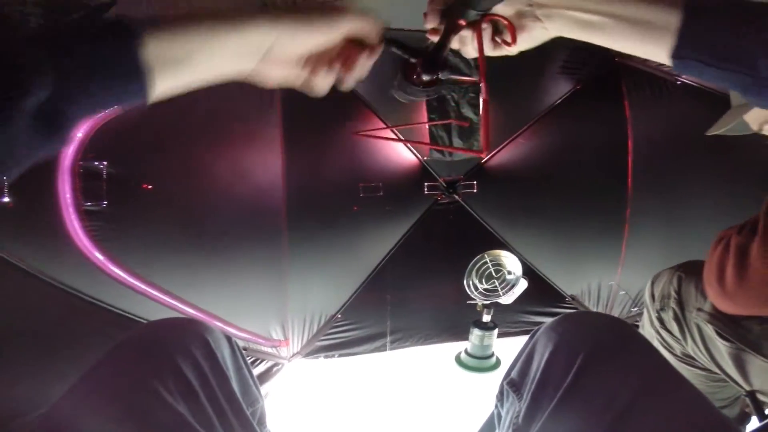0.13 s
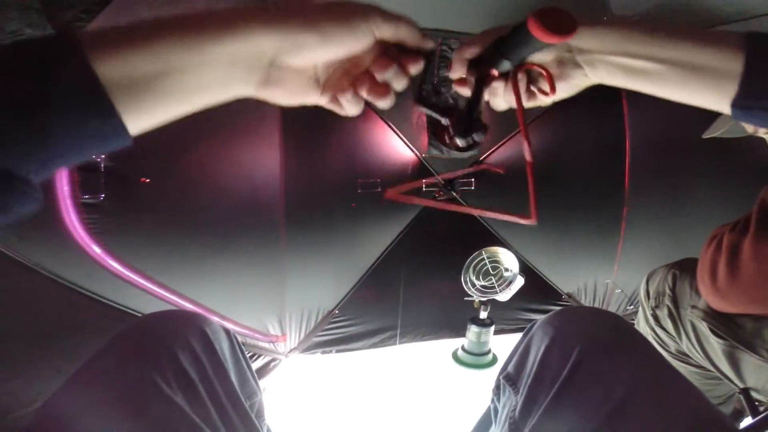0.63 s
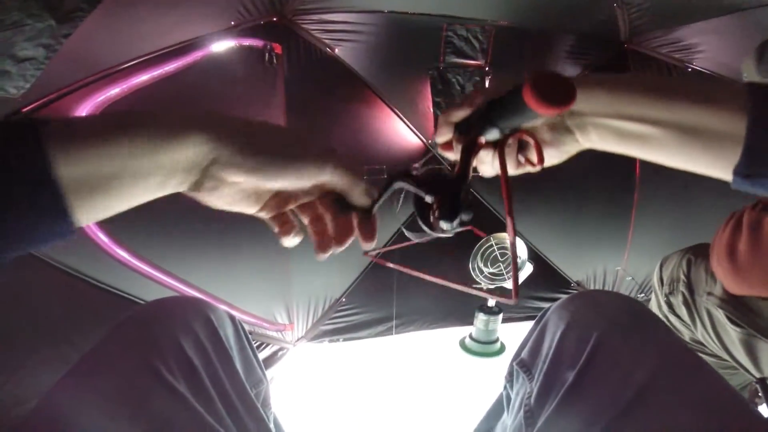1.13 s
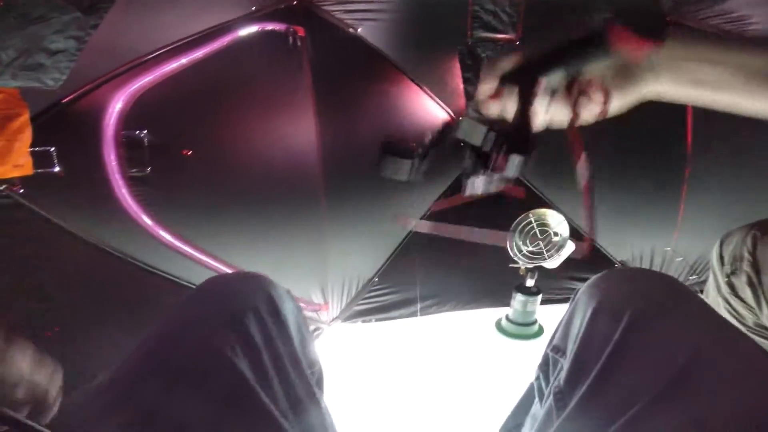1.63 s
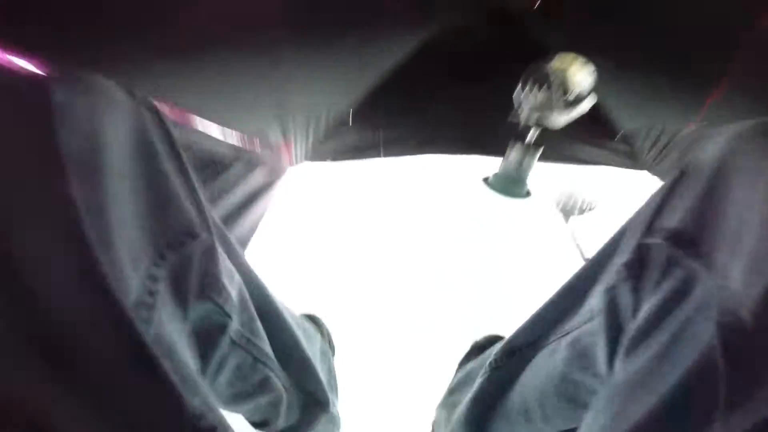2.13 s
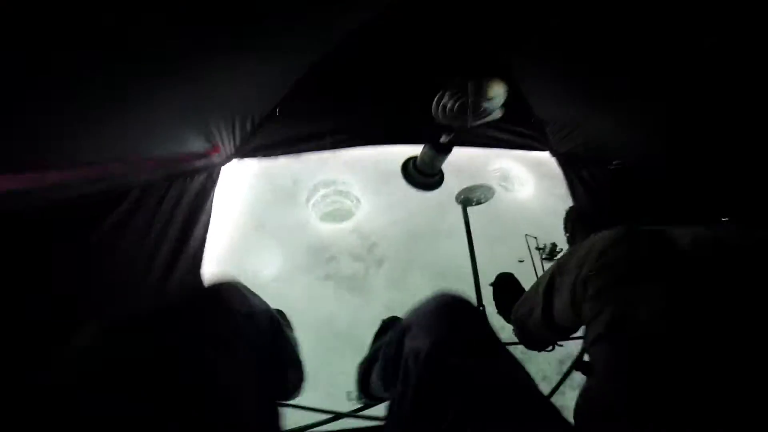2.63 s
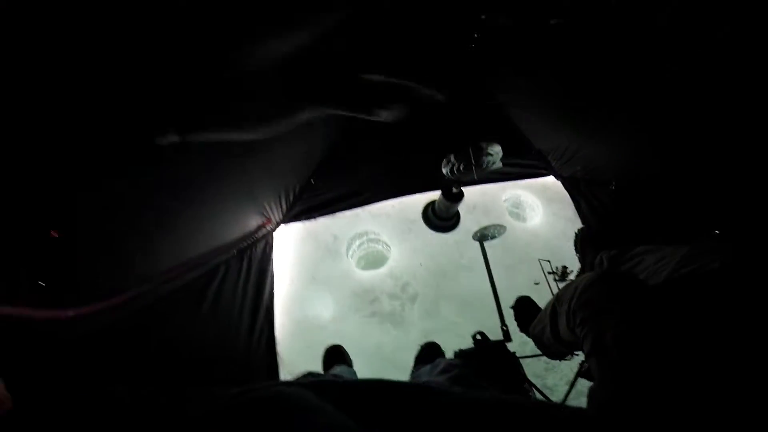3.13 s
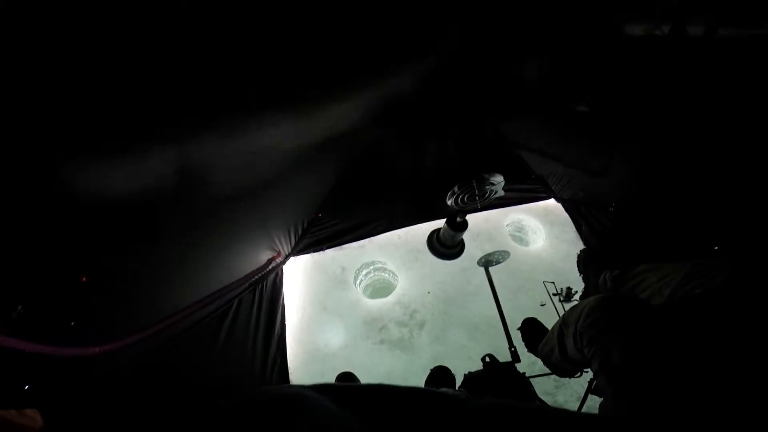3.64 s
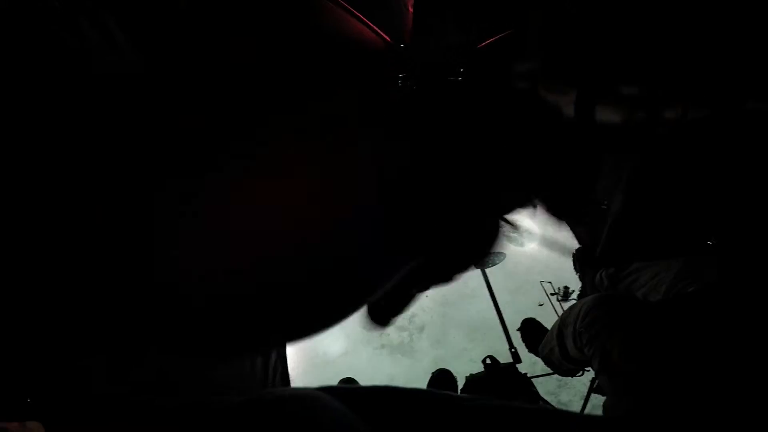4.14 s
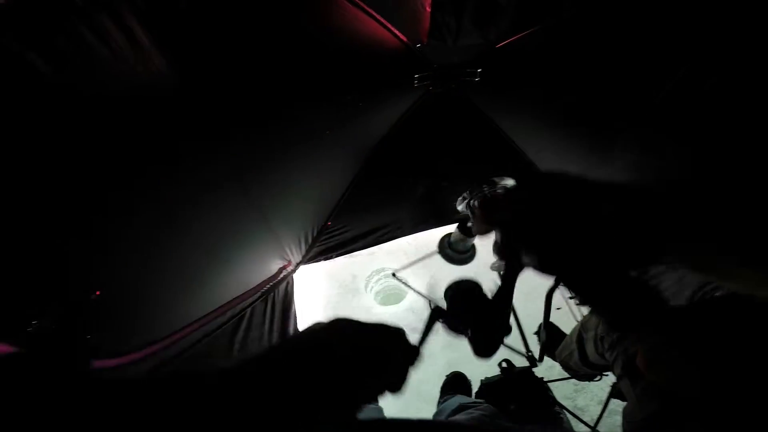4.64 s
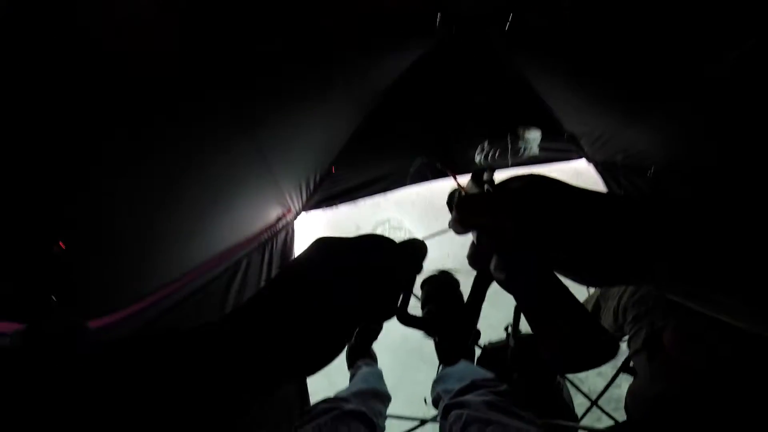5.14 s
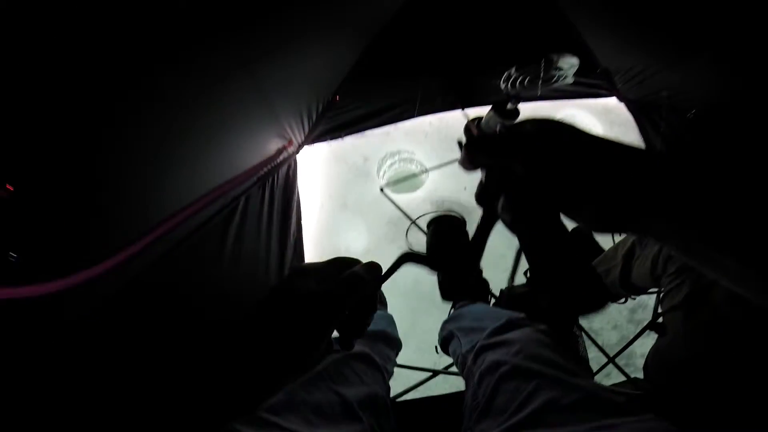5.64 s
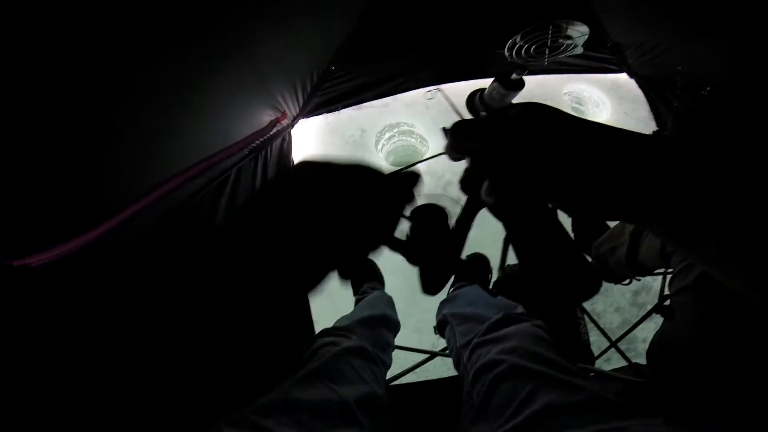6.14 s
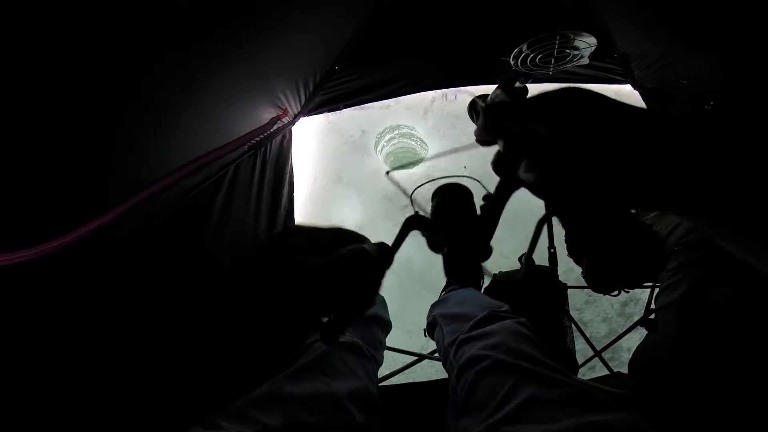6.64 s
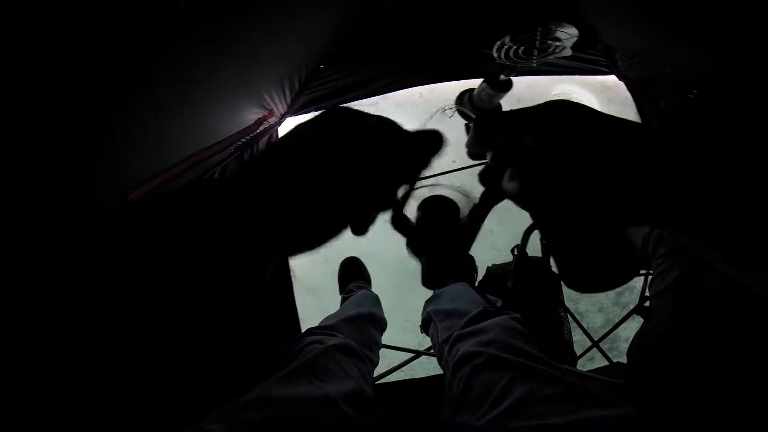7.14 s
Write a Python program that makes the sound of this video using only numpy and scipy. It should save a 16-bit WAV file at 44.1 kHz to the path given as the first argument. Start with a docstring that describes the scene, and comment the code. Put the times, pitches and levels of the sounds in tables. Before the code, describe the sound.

Close clothing rustle and soft bumps build to sharp clicks and a loud hollow plastic crack, then settle into hiss, small taps and faint electronic buzzes.

```python
"""Cloth rubs and bumps a chest-worn camera: noise with catches and ticks through case resonances, plus low shake.
The strap clicks as the wearer stands: noise bursts through the case with a ringing thump; taps and soft bumps ring.
The plastic mount knocks and scrapes: bursts and gritty noise drive its shell and hollow.
The circuits add shaped hiss, a faint three-tone whine, pulsed high buzzes, falling chirps and two-tone blips."""
import sys
import numpy as np
from scipy import signal
from scipy.fft import rfft, irfft, next_fast_len
from scipy.io import wavfile
from scipy.ndimage import uniform_filter1d, map_coordinates

SR = 44100
rng = np.random.default_rng(int(sys.argv[2]) if len(sys.argv) > 2 else 0)


def persist_wave(psi):
    """Save psi, clipped to +-1, as 16-bit WAV."""
    counts = np.round(np.clip(psi, -1, 1) * 32767).astype(np.int16)
    wavfile.write(sys.argv[1], SR, np.atleast_2d(counts).T)


def gain_from_decibels(decibels):
    """Convert decibel values to linear amplitude factors."""
    exponent = np.asarray(decibels, float) / 20
    return 10 ** exponent


N = 321048
T = np.arange(N) / SR  # s

# case resonances in four groups, low to high (f/Hz, width/Hz, relative level/dB)
CASE = [
    [(1521, 250, -1.5)],
    [(2235, 228, 5), (2832, 370, -5)],
    [(3250, 180, -5), (3840, 480, -9), (4655, 510, -13.5)],
    [(5310, 470, -12.5), (5960, 370, -9.5), (8020, 940, -20.5), (11400, 1600, -25.5), (14600, 2200, -30)],
]


def unit(x):
    """Scale to rms 1."""
    return x / np.sqrt(np.mean(x ** 2) + 1e-20)


def filtered(x, response):
    """Apply a complex response of frequency to x."""
    m = next_fast_len(N + SR // 2)
    spectrum = rfft(x, m) * response(np.fft.rfftfreq(m, 1 / SR))
    return irfft(spectrum, m)[:N]


def coloured(points):
    """Noise of rms 1 with its spectrum interpolated over log frequency."""
    f_hz, level_db = np.transpose(points)
    response = lambda hz: gain_from_decibels(np.interp(np.log(hz + 1), np.log(f_hz), level_db))
    return unit(filtered(rng.standard_normal(N), response))


def wobble(rate_hz):
    """Smooth random curve of rms 1, rate_hz knots a second."""
    knots = rng.standard_normal(int(N * rate_hz / SR) + 4)
    return unit(map_coordinates(knots, [T * rate_hz]))


def ring(modes, spread_db, attack_s):
    """One blow: damped modes at slightly random strengths, peak 1."""
    t = T[:SR // 5]
    x = np.zeros(len(t))
    for hz, db, t60_s in modes:
        level_db = db + spread_db * rng.standard_normal() - 60 * t / t60_s
        x += gain_from_decibels(level_db) * np.sin(2 * np.pi * hz * t)
    x *= 1 - np.exp(-t / attack_s)
    return x / np.abs(x).max()


def crackle(t60_s):
    """A sharp contact plus a short decaying noise burst, energy 1."""
    t = T[:SR // 20]
    burst = rng.standard_normal(len(t)) * gain_from_decibels(-60 * t / t60_s) * (1 - np.exp(-t / 0.00032))
    burst = burst / np.linalg.norm(burst) + 0.77 * (t == 0)
    return burst / np.linalg.norm(burst)


def resonances(modes, first):
    """Causal band-pass modes, alternating in sign from mode number first."""
    def response(f):
        total = 0
        for k, (centre, width, db) in enumerate(modes, first):
            damping = 1j * f * width
            total = total + (-1) ** k * gain_from_decibels(db) * damping / (centre ** 2 - f ** 2 + damping)
        return total / (1 + 1j * f / 9000) ** 2  # the far treble rolls off
    return response


def body(groups, drives):
    """Each group of resonances responds to its own excitation."""
    out, first = np.zeros(N), 0
    for modes, drive in zip(groups, drives):
        out += filtered(drive, resonances(modes, first))
        first += len(modes)
    return out


def add(track, t_s, x):
    """Mix x in at t_s."""
    part = track[round(t_s * SR):][:len(x)]
    part += x[:len(part)]


def sparse(rate_hz, size):
    """Random impulses, rate_hz a second on average."""
    return (rng.random(N) < rate_hz / SR) * rng.standard_normal(N) * size


def cloth():
    """Fibres slide over the case with catches and ticks, folds crumple; the chest shakes the microphone."""
    # wearer's movement (t/s, chest shake level/dB, cloth rub level/dB)
    movement = [(0.0, -58, -54.5), (0.09, -48.5, -44.5), (0.19, -52.5, -59), (0.45, -53, -60),
                (0.68, -57.5, -64.5), (1.06, -59, -60), (1.4, -55.5, -59.5), (1.6, -53, -54.5),
                (1.9, -51.5, -59.5), (2.1, -42, -50.5), (2.23, -34.5, -42.5), (2.35, -43.5, -52),
                (2.55, -42.5, -40.5), (2.62, -53, -55), (2.8, -46, -58), (3.02, -50.5, -57),
                (3.3, -56.5, -66.5), (3.79, -56.5, -72), (4.13, -57, -62), (5.3, -54, -65.5),
                (5.5, -55.5, -65.5), (6.17, -57, -64), (6.34, -53.5, -59.5), (6.5, -62, -63.5),
                (6.68, -59, -83.5), (7.05, -57.5, -78), (7.27, -56.5, -61.5)]
    # chest shake spectrum (f/Hz, relative level/dB per Hz)
    shake_spectrum = [(8.8, -26), (15, 7.5), (26, -3.5), (54, -8.5), (157, -11), (261, -18.5), (400, -26),
                      (520, -49.5), (880, -120)]
    # cloth fold spectrum (f/Hz, relative level/dB per Hz)
    fold_spectrum = [(150, -40.5), (300, -1), (900, -3), (1400, -8), (4000, -13.5), (7000, -18),
                     (12000, -40)]
    sway_db, sway_hz = 1, 7  # small unplanned movements
    fine_db, dull_per_db = 3, 0.33  # treble boost; falls as the chest shake grows
    fold_db = -9.5  # re rub
    t_s, *levels = np.transpose(movement)
    shake_db, rub_db = [np.interp(T, t_s, level) + sway_db * wobble(sway_hz) for level in levels]

    slide = rng.standard_normal(N) * gain_from_decibels(.7 * wobble(30) + 2 * wobble(200))
    catches = slide * gain_from_decibels(wobble(60) - 1) + sparse(30, 13)
    ticks = np.diff(sparse(15, 8), prepend=0)  # crisp creases snap in the treble
    scale = gain_from_decibels(rub_db) / np.std(body(CASE, [slide, catches, slide, slide]))
    fine = scale * gain_from_decibels(fine_db - dull_per_db * (shake_db - shake_db.mean()))
    rub = body(CASE, [scale * slide, scale * catches, fine * slide, fine * (slide + ticks)])

    shake = gain_from_decibels(shake_db) * unit(coloured(shake_spectrum) * gain_from_decibels(2 * wobble(14)))
    crumple = unit(coloured(fold_spectrum) * gain_from_decibels(3 * wobble(25) + 3 * wobble(150)))
    return rub + gain_from_decibels(rub_db + fold_db) * crumple + shake


def clicks():
    """Strap and gear click: crackle of a few ms through the case, with a low thump as it rocks."""
    # clicks (t/s, level/dB, weight/dB, brightness/dB), all relative
    hits = [(0.2852, -45, -7, -8), (0.55, -46, -3, 3), (1.424, -40, -18, -1), (1.905, -43, -5, -7),
            (1.933, -43, -12, -8), (1.9672, -38.5, 0, 0), (2.0532, -26.5, -7.5, -2.5),
            (2.1024, -24, -3, -2), (2.145, -21.5, -8, -2), (2.188, -21, -5, 2.5), (2.1987, -27, -6, -1.5),
            (2.2116, -29.5, 5, -3), (2.389, -8, -4.5, -4.5), (2.3941, -16.5, 2.5, -10),
            (2.6062, -30, 1.5, -7), (2.702, -36, 7, 8.5), (2.7074, -26, 6.5, 1.5), (2.7408, -23, 8, 4),
            (2.7475, -23.5, 2.5, -1.5), (2.761, -46, 16, 17), (2.7798, -25, 4, 5.5),
            (2.7872, -27, 5.5, 9.5), (2.828, -24, 5.5, 7), (2.843, -38, 8, 7), (2.9653, -22.5, 4.5, 8),
            (2.9858, -25, 2, 7.5), (3.076, -49, 7.5, 0), (3.176, -54, 3, 19.5), (3.7503, -46, 3, -3.5),
            (4.156, -45.5, -3, 0), (5.0366, -47.5, 2, -1), (5.0751, -41.5, -7, -7.5), (5.2227, -47, -2, -3),
            (5.257, -43.5, -2.5, -5.5), (5.3043, -41, -10, -5), (5.667, -31.5, -4, -8),
            (5.7195, -20, -8.5, 4.5), (5.75, -42, -3, -2), (6.253, -36, -4, -9), (6.341, -40, -4, -8)]
    # case rocking on the chest (f/Hz, relative level/dB, t60/s)
    rocking = [(150, -7.5, 0.099), (283, 3, 0.018), (427.2, -9.5, 0.032)]
    group_db = [27.5, 25, 26.2, 26.2]  # drive of the case groups
    thump_db, thump_per_db = -6, 0.77  # re click; gain per dB of weight
    drives, thumps = np.zeros((4, N)), np.zeros(N)
    for t_s, db, weight_db, bright_db in hits:
        burst = gain_from_decibels(db) * crackle(0.013)
        snap = burst * gain_from_decibels(-60 * T[:len(burst)] / 0.013)  # top group decays faster
        shares_db = np.add(group_db, [weight_db, 0, bright_db, bright_db])
        for drive, share_db, push in zip(drives, shares_db, [burst, burst, burst, snap]):
            add(drive, t_s, gain_from_decibels(share_db) * push)
        thump = ring(rocking, spread_db=6.5, attack_s=0.00021)
        add(thumps, t_s, gain_from_decibels(db + thump_per_db * weight_db + thump_db) * thump)
    return body(CASE, drives) + thumps


def taps():
    """Taps ring a small part at one mode and crackle through the second case group."""
    # taps (t/s, ring peak/dB, snap relative to ring/dB)
    hits = [(1.191, -44, 12.5), (3.262, -45, -11), (3.4358, -47, -9), (3.6509, -39.5, -3.5),
            (4.0626, -34.5, -9)]
    # small part (f/Hz, relative level/dB, t60/s)
    part = [(1640, 0, .05)]
    drives, rings = np.zeros((4, N)), np.zeros(N)
    for t_s, db, snap_db in hits:
        add(rings, t_s, gain_from_decibels(db) * ring(part, spread_db=0, attack_s=0.00008))
        add(drives[1], t_s, gain_from_decibels(db + snap_db + 23.5) * crackle(0.0076))
    return body(CASE, drives) + rings


def bumps():
    """Soft bumps of the body: a damped low mode and a weaker one at 2.1 times its frequency."""
    # bumps (t/s, relative level/dB, f/Hz)
    hits = [(.04, -42.5, 94), (.286, -35, 105.6), (1.491, -31.5, 116), (2.004, -37.5, 100),
            (2.207, -33.5, 135), (2.474, -23, 134.5), (2.535, -32.5, 217), (5.905, -45, 63.8),
            (6.906, -46.5, 61.7), (7.115, -41.5, 61)]
    out = np.zeros(N)
    for t_s, db, hz in hits:
        modes = [(hz, 0, .07), (2.1 * hz, -7, .035)]
        add(out, t_s, gain_from_decibels(db - 2.5) * ring(modes, spread_db=1, attack_s=.002))
    return out


def knocks(hollow):
    """Knocks crack the shell and ring the hollow; returns shell drives and hollow sound."""
    # knocks (t/s, shell level/dB, middle/dB, treble/dB, hollow peak/dB); shell columns relative
    hits = [(2.6491, -1.5, 7, 5, -10.5), (2.6585, -7, 4, 2, -13.5), (2.870, -41, 14, 15, -36.5),
            (2.886, -27, -5, -16, -39), (2.899, -29, -8, -14, -52), (5.4140, -26.5, 2.5, 15, -26.5),
            (5.418, -31.5, 4, 16, -38), (5.437, -49, 4, 12, -65), (5.457, -30, -2.5, 1, -41.5),
            (5.462, -41, 2, 12, -47), (5.474, -40, 0, 4, -41)]
    group_db = [24, 26, 22, 36]  # drive of the shell groups
    hard_per_db = .6  # harder knocks reach further into the top group
    # after its rebound the hardest knock chatters
    start_s, gap_s, first_db, loss_db = 2.663, .0042, -8.5, 4.5
    chatter = []
    for k in range(6):
        db = first_db - loss_db * k
        chatter.append((start_s + k * gap_s, db, 2.5 - .8 * k, -1.5 - 1.5 * k, db - 7.5))
    drives, cavity = np.zeros((4, N)), np.zeros(N)
    for t_s, db, middle_db, treble_db, hollow_db in hits + chatter:
        burst = gain_from_decibels(db) * crackle(0.012)
        shares_db = np.add(group_db, [0, middle_db, treble_db, hard_per_db * db])
        for drive, share_db in zip(drives, shares_db):
            add(drive, t_s, gain_from_decibels(share_db) * burst)
        add(cavity, t_s, gain_from_decibels(hollow_db) * hollow)
    return drives, cavity


def scrapes(hollow):
    """Gritty noise swells, then stops; returns shell drives and hollow sound."""
    # scrapes (start/s, peak/s, end/s, relative peak level/dB, relative hollow level/dB)
    strokes = [(2.823, 2.831, 2.846, -39, 1.5), (2.85, 2.885, 2.914, -36.5, -4),
               (5.382, 5.397, 5.409, -48, 17), (5.408, 5.43, 5.452, -52, -10),
               (5.434, 5.462, 5.487, -46, -13.5)]
    swell_db, fade_db = 10, 15.5  # below the peak at start and end
    group_gain = gain_from_decibels(np.array([[13], [8], [5], [0]]))
    rasp = rng.standard_normal(N) * gain_from_decibels(3.4 * wobble(300))
    drives, push = np.zeros((4, N)), np.zeros(N)
    for start_s, peak_s, end_s, db, hollow_db in strokes:
        levels_db = [db - swell_db, db, db - fade_db]
        grit = rasp * gain_from_decibels(np.interp(T, [start_s, peak_s, end_s], levels_db, left=-120, right=-120))
        drives += group_gain * grit
        push += grit * gain_from_decibels(hollow_db - 24)
    return drives, signal.fftconvolve(push, hollow)[:N]


def stiffness(f):
    """High-pass at 1400 Hz: the stiff shell hardly moves below its first mode."""
    u = f / 1400
    return (1j * u / (1 + 1.2j * u - u ** 2) * 1j * u) ** 2


def mount():
    """Knocks and scrapes sound through the mount's plastic shell and its cavity."""
    # shell resonances in four groups, low to high (f/Hz, width/Hz, relative level/dB)
    shell = [
        [(1603, 170, 3.5), (2100, 190, 2), (2217, 100, 2.5), (2766, 140, 1)],
        [(3240, 230, -9.5), (4000, 610, -9.5), (5170, 450, -8), (5950, 470, -9)],
        [(7670, 450, -9), (9010, 670, -25.5)],
        [(11600, 1500, -24), (14180, 1800, -23)],
    ]
    # cavity modes (f/Hz, relative level/dB, t60/s)
    cavity_modes = [(710, -14, .04), (787, 3, .055), (881, -8.5, 0.063)]
    hollow = ring(cavity_modes, spread_db=2.5, attack_s=0.0012)
    knock_drives, knock_cavity = knocks(hollow)
    scrape_drives, scrape_cavity = scrapes(hollow)
    shell_sound = filtered(body(shell, knock_drives + scrape_drives), stiffness)
    return shell_sound + knock_cavity + scrape_cavity


def buzzes():
    """Pulse trains at 136 Hz ring near 10 kHz, with noise around the ring."""
    # buzzes (start/s, length/s)
    spans = [(1.775, 0.15), (1.895, 0.15), (2.04, .07), (2.191, .05), (2.30, 0.055), (2.47, .05),
             (2.78, 0.045), (2.94, .05), (3.955, 0.047), (4.115, 0.049), (4.25, .05), (4.37, 0.043),
             (4.52, .055), (4.625, 0.044), (4.74, 0.05), (4.88, 0.059), (5.007, .05), (5.187, 0.044),
             (5.307, .055), (5.44, .04), (6.14, 0.11), (6.285, .24), (6.585, 0.12), (6.71, .11),
             (6.847, 0.042)]
    rate_hz, rest_s = 136, .5
    out = np.zeros(N)
    gaps_s = np.diff(np.transpose(spans)[0], prepend=0)  # start to start
    for (start_s, length_s), gap_s in zip(spans, gaps_s):
        t = T[:round(length_s * SR)]
        turns = rate_hz * t
        hz = 10520 if gap_s > rest_s else 10220  # higher after a long gap
        chance = rng.standard_normal((64, 2))[turns.astype(int)]  # new pitch and phase each cycle
        pulses = np.sin(np.pi * turns) ** 14
        tone = np.sin(2 * np.pi * (hz + 60 * chance[:, 0]) * (t % (1 / rate_hz)) + chance[:, 1])
        fizz = uniform_filter1d(rng.standard_normal(len(t)), size=10) * np.sin(2 * np.pi * hz * t)
        add(out, start_s, gain_from_decibels(-67) * (pulses * tone + .5 * fizz))
    return out


def chirps():
    """Short falling buzzes: high harmonics of a pulse rate that sags a little."""
    # chirps (start/s)
    starts_s = [3.11, 5.615, 6.975]
    # harmonics (multiple of pulse rate, relative level/dB)
    orders = [(32, -6), (35, -9), (37, -10), (38, 0), (39, -5), (40, -7), (41, -7)]
    t = T[:round(.038 * SR)]
    turns = 273 * t * (1 - .12 * t)
    stack = sum(gain_from_decibels(db) * np.sin(2 * np.pi * k * turns + k * k) for k, db in orders)
    chirp = gain_from_decibels(-70) * stack * signal.windows.tukey(len(t), .2)
    out = np.zeros(N)
    for start_s in starts_s:
        add(out, start_s, chirp)
    return out


def blips():
    """Two steady tones gated for 23 ms with soft edges."""
    # blips (start/s)
    starts_s = [.142, .227, .347, .502, .702, .746, .92, 1.067, 1.207, 1.30, 1.468, 1.636, 3.365, 3.39,
                3.42, 3.542, 3.688, 3.805, 3.858, 5.664, 5.712, 5.87, 6.008, 6.888, 7.025, 7.148, 7.24]
    # tones (f/Hz, peak level/dB)
    pair = [(11280, -75), (9870, -81)]
    tones = sum(gain_from_decibels(db) * np.sin(2 * np.pi * hz * T) for hz, db in pair)
    on = sum((T >= start_s) & (T < start_s + .023) for start_s in starts_s)
    return tones * uniform_filter1d(np.minimum(on, 1.), size=64)


def whine():
    """Steady sines with a shared random timing drift."""
    # whine (f/Hz, rms level/dB)
    tones = [(5850, -89), (8780, -87), (11705, -86)]
    drift_s = 1.1 * wobble(40) / 50000
    return sum(gain_from_decibels(db + 3) * np.sin(2 * np.pi * hz * (T + drift_s)) for hz, db in tones)


def hiss():
    """Circuit noise: steady Gaussian noise, shaped in frequency."""
    # hiss spectrum (f/Hz, relative level/dB per Hz)
    spectrum = [(120, -40.5), (200, 1.5), (294, -3), (440, -2.5), (548, -3.5), (671, -4.5), (916, -6),
                (3900, -14.5), (5730, -18.5), (8270, -23.5), (10300, -24.5), (14600, -30.5), (15200, -31),
                (15600, -60)]
    return gain_from_decibels(-62.5) * coloured(spectrum)


def scene():
    """One microphone picks up the case, the mount and the circuits."""
    handling = cloth() + clicks() + taps() + bumps() + mount()
    circuits = buzzes() + chirps() + blips() + whine() + hiss()
    return (handling + circuits)[None]


def roll_off(x):
    """The treble ends steeply here."""
    return signal.sosfilt(signal.butter(12, 16520, fs=SR, output="sos"), x)


def record(dry):
    """Peaks near full scale are rounded off."""
    mix = dry / (1 + np.abs(dry / .99) ** 10) ** (1 / 10)
    return roll_off(mix)


dry = scene()
out = record(dry)
persist_wave(out)
```